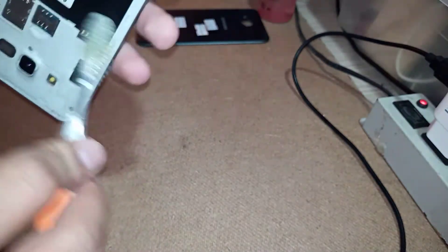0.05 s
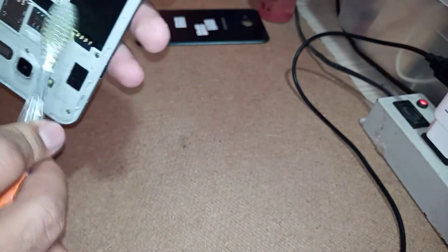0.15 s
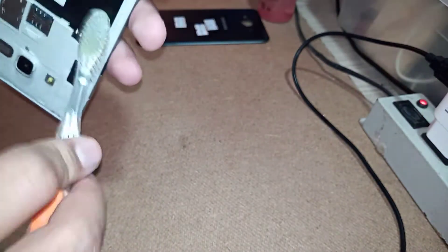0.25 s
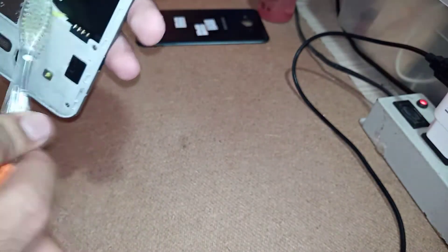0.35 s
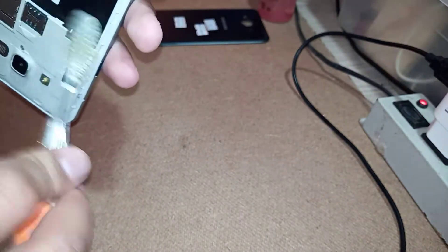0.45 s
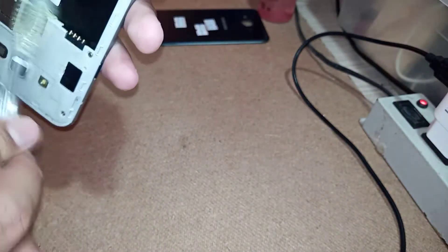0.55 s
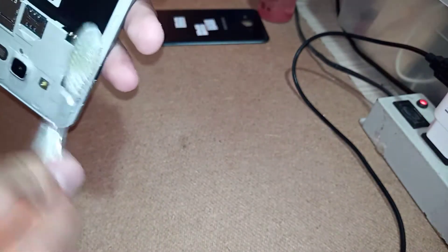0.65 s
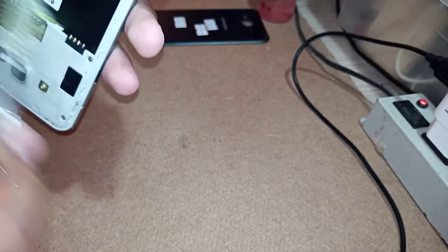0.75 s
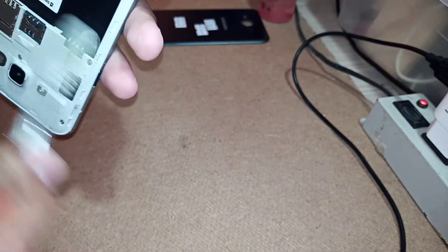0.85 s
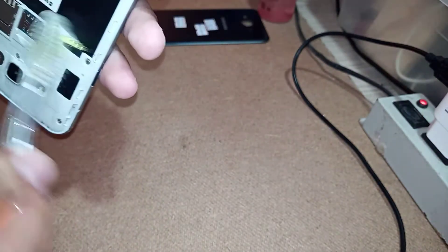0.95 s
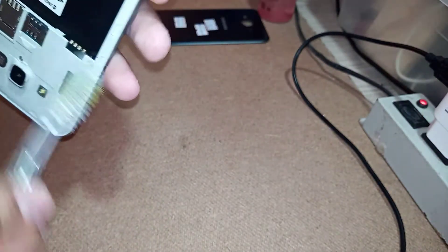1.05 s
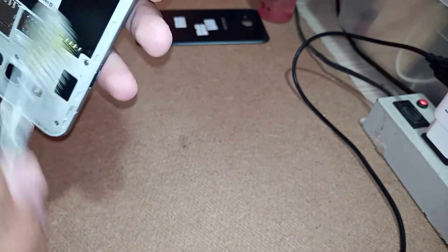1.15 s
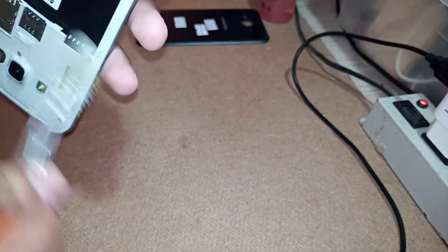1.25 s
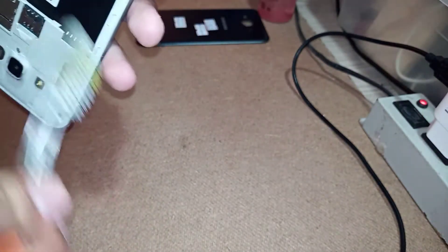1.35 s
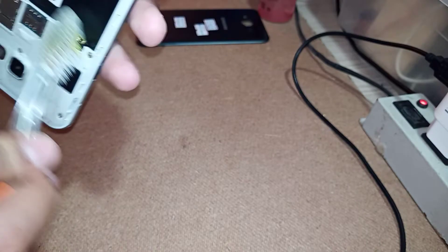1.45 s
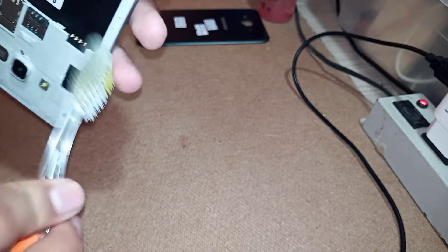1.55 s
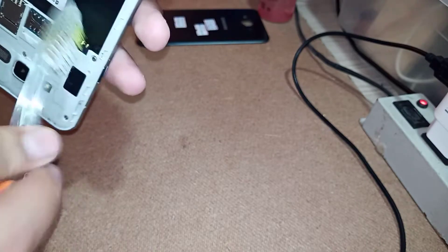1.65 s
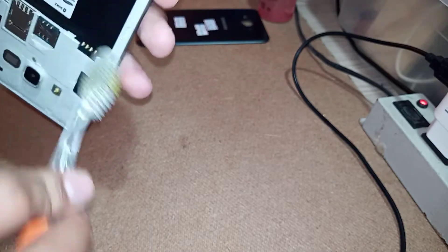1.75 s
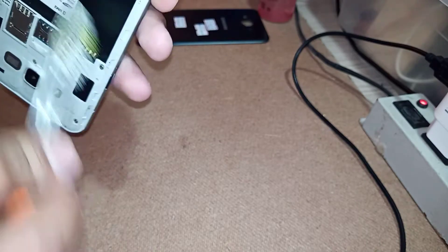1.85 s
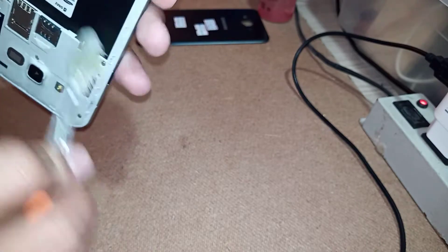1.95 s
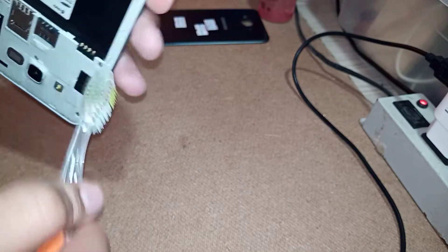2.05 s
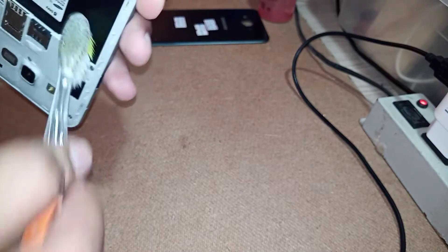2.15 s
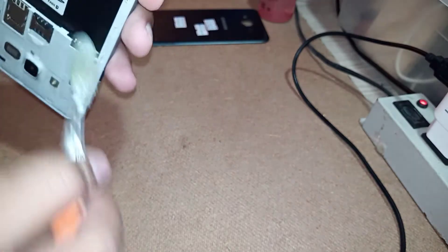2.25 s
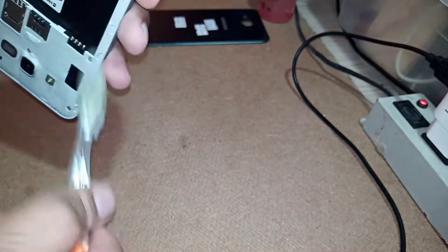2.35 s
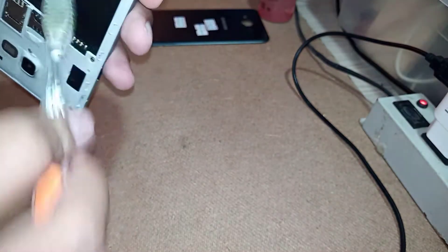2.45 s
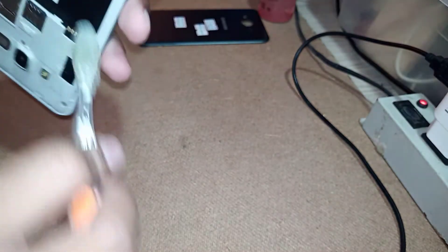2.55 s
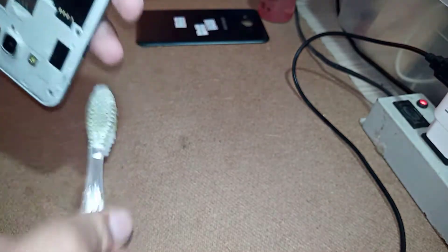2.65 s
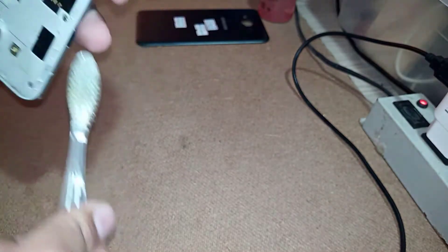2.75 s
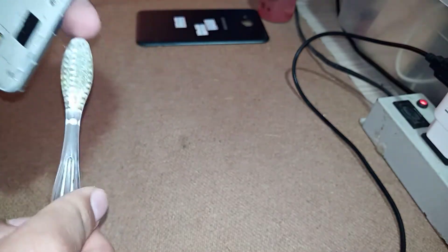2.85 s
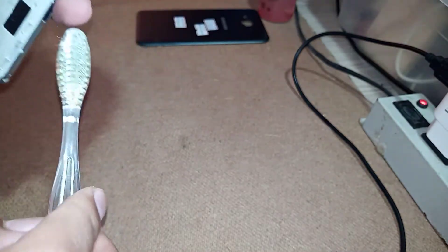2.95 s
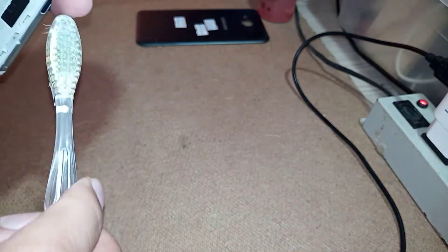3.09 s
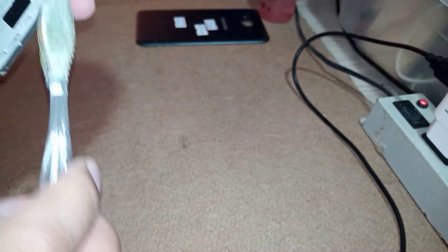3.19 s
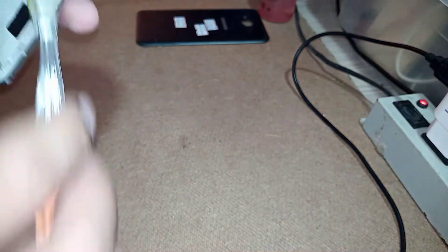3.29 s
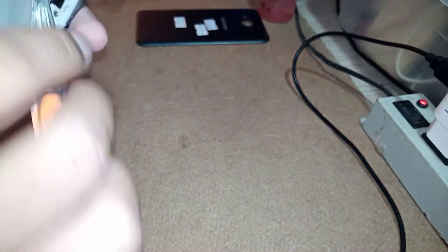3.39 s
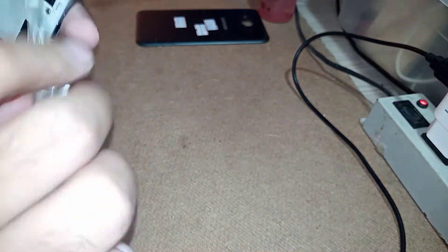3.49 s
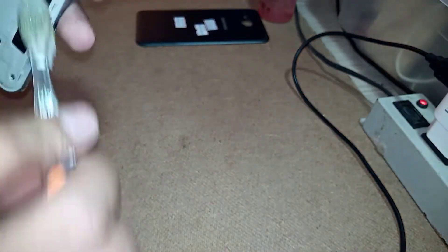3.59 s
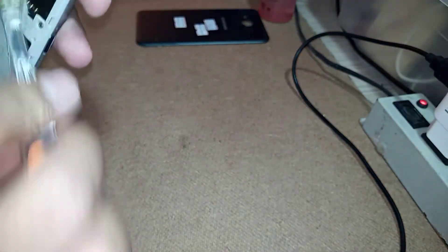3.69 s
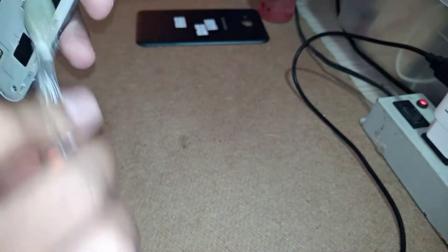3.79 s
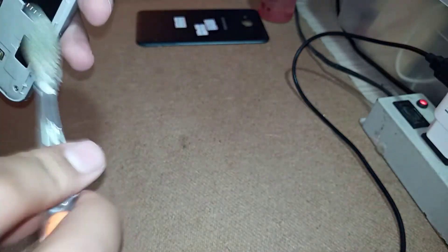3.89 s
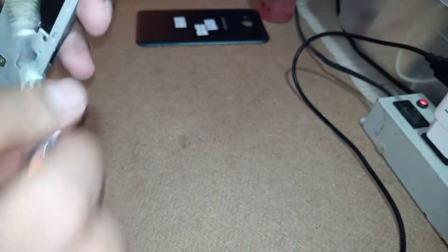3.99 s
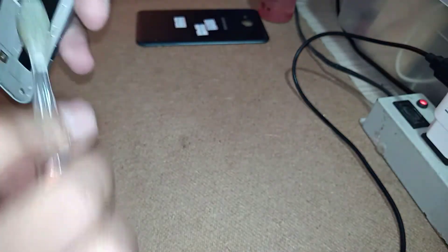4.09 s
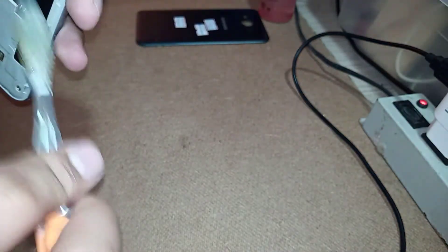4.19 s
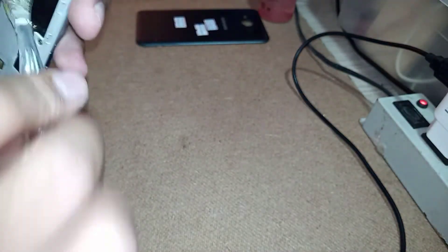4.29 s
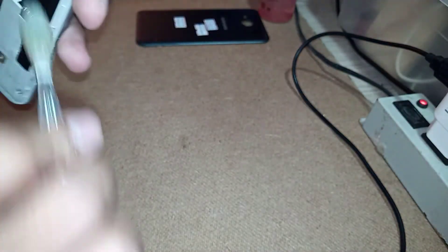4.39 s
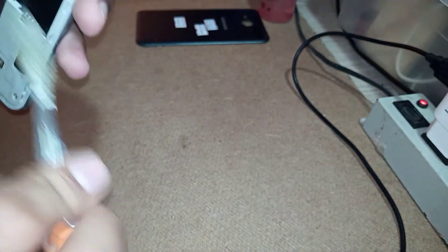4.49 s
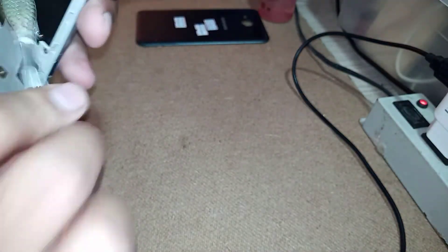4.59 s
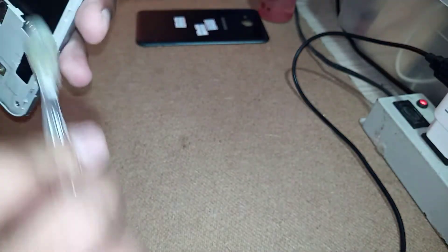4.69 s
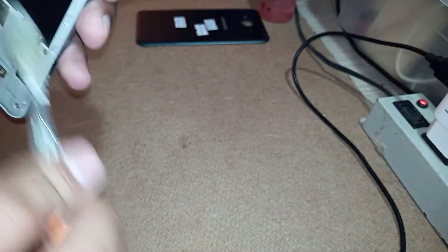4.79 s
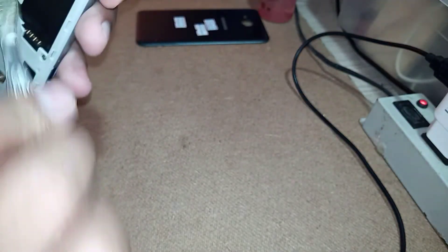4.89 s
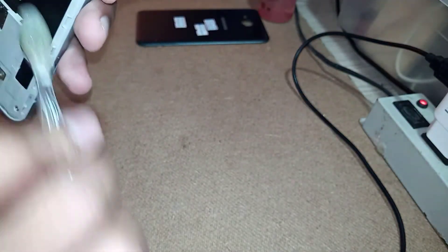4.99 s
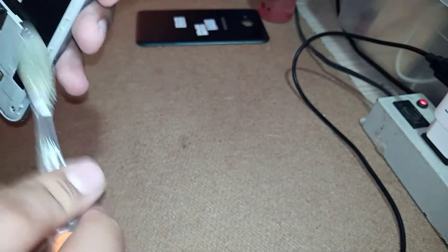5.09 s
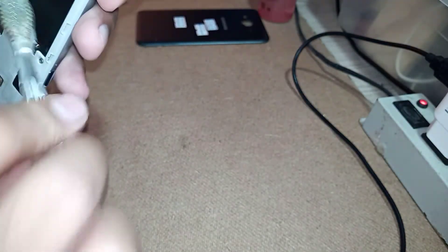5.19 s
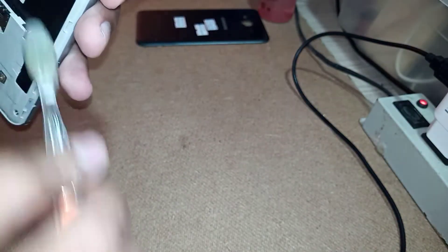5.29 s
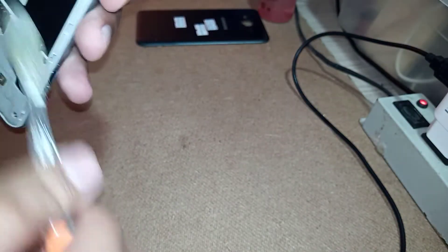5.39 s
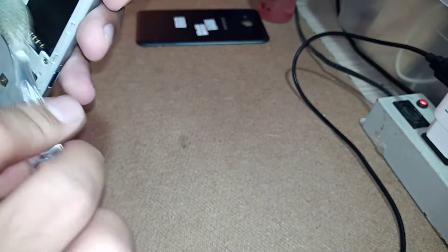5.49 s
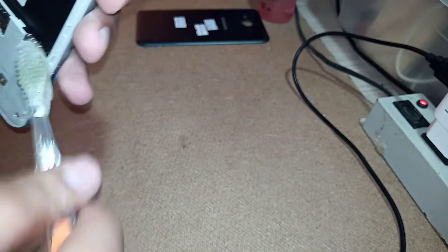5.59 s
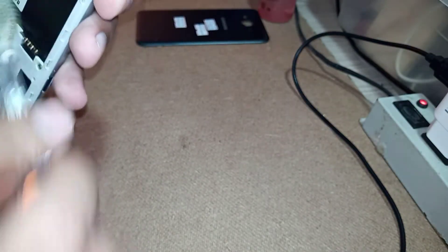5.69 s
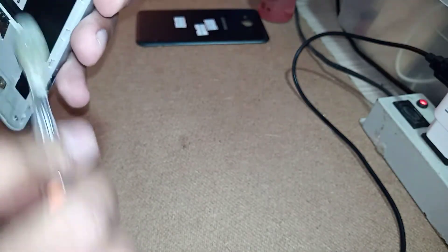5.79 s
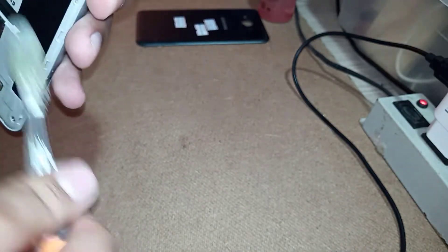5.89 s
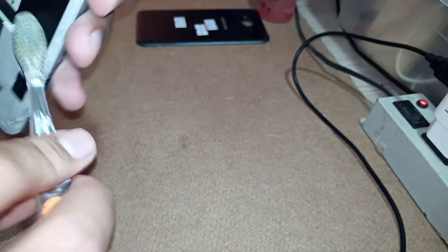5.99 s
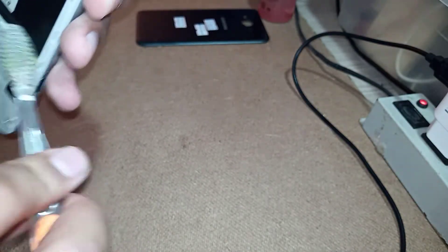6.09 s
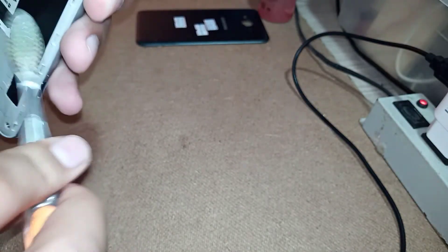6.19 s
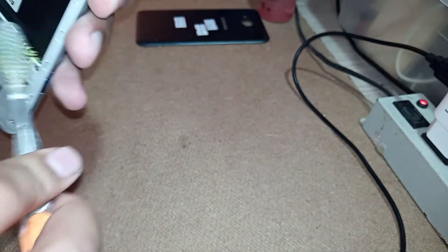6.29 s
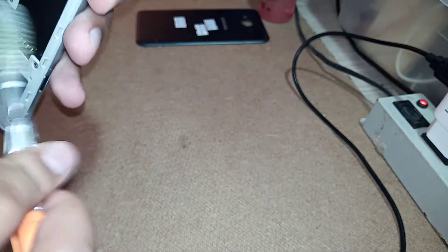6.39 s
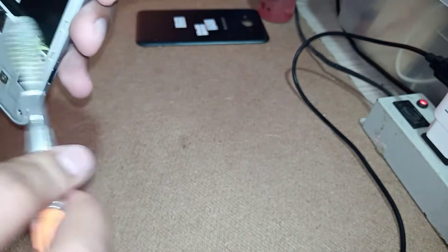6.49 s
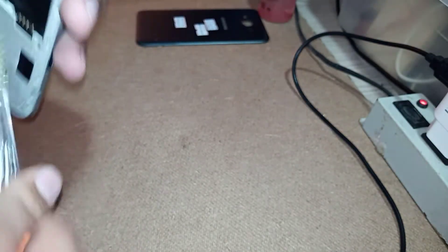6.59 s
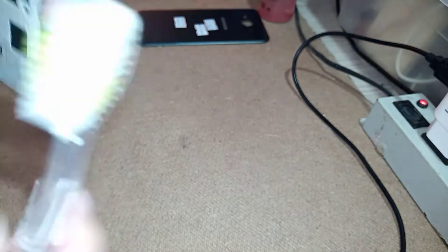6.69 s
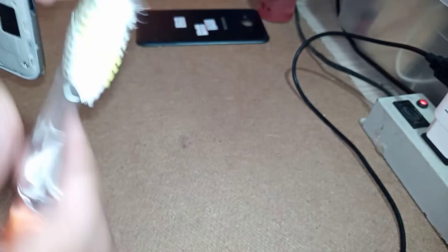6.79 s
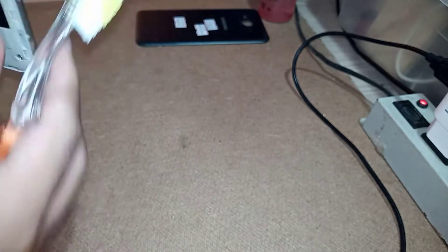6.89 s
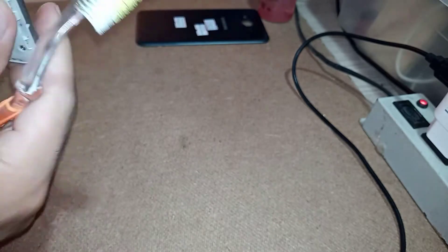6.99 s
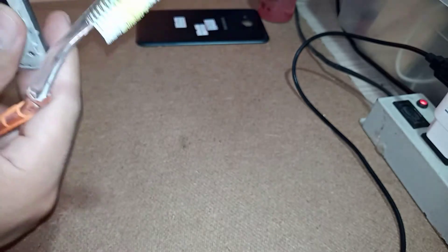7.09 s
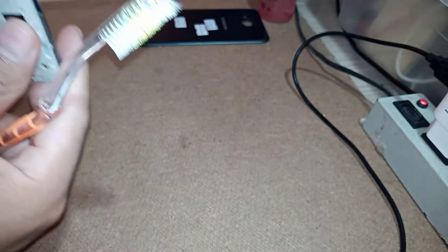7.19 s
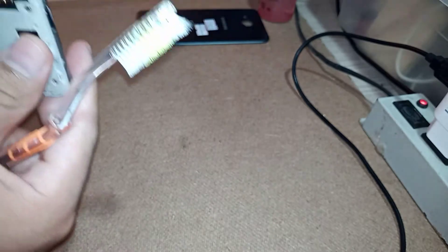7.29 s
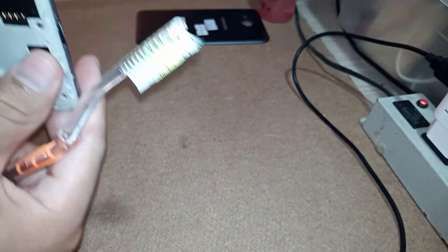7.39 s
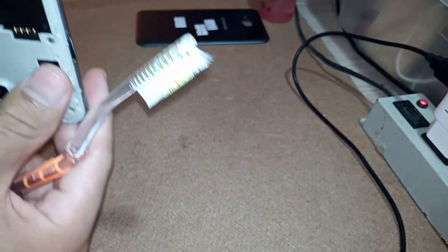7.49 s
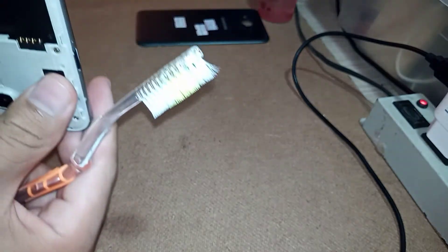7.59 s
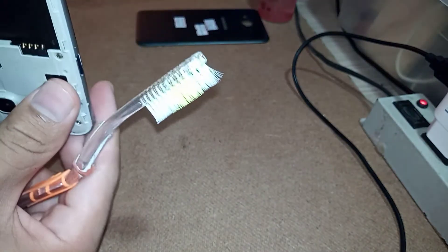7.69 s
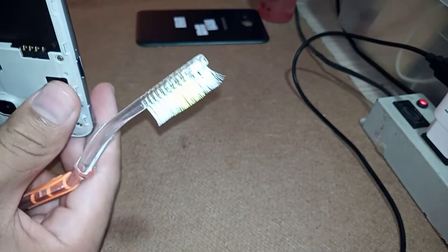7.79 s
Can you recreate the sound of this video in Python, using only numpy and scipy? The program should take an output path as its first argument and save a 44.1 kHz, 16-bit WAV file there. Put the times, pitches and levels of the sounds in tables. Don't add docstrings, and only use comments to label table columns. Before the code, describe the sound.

Dry, bright bristle rasps flick over small ribs of a hand-held phone, quick and continuous at first, then spaced about a quarter second apart. The brush head clacks sharply on the hard frame as it lands, with a small hollow ring. A pause lets a far engine rev through; more strokes follow, ending in near silence. Close microphone, small indoor room, low hiss.

```python
import sys
import numpy as np
from scipy import signal
from scipy.fft import rfft, irfft
from scipy.io import wavfile
from scipy.ndimage import uniform_filter1d

SR = 44100
rng = np.random.default_rng(int(sys.argv[2]) if len(sys.argv) > 2 else 0)


def field_ratio(decibels):
    return 10 ** (np.asarray(decibels, dtype=float) / 20)


def master_out(mix):
    frames = np.transpose(np.atleast_2d(mix))
    ceiling = np.clip(frames, -1, 1)
    pcm = np.round(ceiling * 32767).astype(np.int16)
    wavfile.write(sys.argv[1], SR, pcm)


N = 346171
T = np.arange(N) / SR

# [fastest t/s, fall t/s, pressure level/dB, tip flick above pressure level/dB]
SCRUBS = [(0.0, 0.049, -50, -1), (0.126, 0.036, -40.5, -2), (.223, 0.033, -40.5, -0.5),
          (0.352, .035, -38, -1), (0.448, 0.035, -41.5, -1), (0.556, 0.04, -38.5, -1.5),
          (.662, 0.038, -40.5, -0.5), (0.769, 0.033, -38.5, 2), (0.884, 0.041, -40.5, 1),
          (.987, .03, -37, -4.5), (1.061, 0.032, -37, -1.5)]
SWEEPS = [(1.288, 0.027, -37.5, 3.5, 1.1), (1.52, 0.048, -39, 4, 2.5), (1.762, 0.036, -39, 4, 0.8),
          (2.011, 0.071, -45.5, 1.5, 0.5), (2.283, 0.044, -42.5, 1, 3.1), (2.576, 0.047, -42.5, -1, 2.5),
          (3.56, 0.056, -42, 1, 2), (3.843, 0.064, -43.5, 2.4, 1.17), (4.14, 0.059, -43.5, 1.5, 1.5),
          (4.434, 0.039, -39, 1, 1.4), (4.72, 0.052, -43, 2.6, 1.2), (5.015, 0.053, -41.5, 2.5, 2.9),
          (5.295, .062, -44, 2.7, 2.4), (5.57, 0.056, -39, -1, 1.2), (5.822, 0.056, -42.5, -0.5, 1.5),
          (6.11, 0.088, -49.5, -6, 1.9), (6.322, 0.036, -46.5, 2.3, 1.6), (6.523, 0.018, -43, 2.5, 2.8)]
# [t/s, level/dB]
BITES = [(0.13, -4), (0.165, -4), (0.355, 2), (0.376, -3), (0.565, 2), (0.64, 5), (0.655, 5), (0.734, -3),
         (0.77, 3), (0.828, -5), (0.986, 3), (1.017, -4), (1.058, 2), (1.255, 3), (1.296, 6), (1.308, -3),
         (1.318, 5), (1.516, 6), (1.538, 3), (1.556, -3), (1.727, -12), (1.768, 7), (1.81, 12), (1.933, -3),
         (2.001, 3), (2.023, 3), (2.301, -3), (2.315, 5), (2.367, 6), (2.608, 6), (3.496, -5), (3.52, -4),
         (3.592, -3), (3.778, -8), (3.9, 3), (4.075, -3), (4.1, 5), (4.355, -6), (4.409, -4), (4.439, 2),
         (4.685, 3), (4.78, 6), (5.02, 3), (5.05, -4), (5.083, 4), (5.253, -3), (5.27, 4), (5.513, -8),
         (5.543, 3), (5.559, 2), (5.573, 3), (5.603, 2), (5.8, 2), (6.094, 3), (6.109, -3), (6.146, 3),
         (6.272, -4), (6.308, -4), (6.465, 4), (6.48, -5)]
# [t/s, level/dB]
LEAN = [(0, -1), (.4, -1), (.8, 0), (1.29, -1), (1.53, -1), (1.77, -1), (2.01, 1), (2.28, 1), (2.58, 2),
        (3.56, 1), (3.84, -2), (4.14, 1), (4.43, -1), (4.73, 2), (5.02, 2), (5.57, -1), (5.83, -3.5),
        (6.1, 2.5)]
# [f/Hz, width f/Hz, level/dB]
RIBS = [(470, 260, -21), (970, 390, -26), (3650, 1300, -3), (4904, 600, -8), (6335, 1400, -13.5),
        (6966, 2610, 1.5)]
# [t/s, f/Hz, level/dB]
RIB_PATH = [(0, 5200, 0), (.13, 5000, 0), (.22, 4900, 0), (.35, 4900, 0), (.45, 5000, -3), (.56, 4900, 2),
            (.66, 5600, 0), (.77, 4900, 0), (.88, 5100, 0), (1.06, 5300, 0), (1.25, 4800, 2),
            (1.3, 5000, 2), (1.52, 4800, 2), (1.76, 4900, 0), (1.97, 4800, -3), (2.02, 4900, 4),
            (2.23, 5100, 0), (2.29, 5500, 0), (2.55, 5210, 2), (3.56, 5960, 0), (3.84, 5800, 0),
            (4.15, 5800, -4), (4.43, 4940, 2), (4.7, 4900, 0), (4.76, 5900, -2), (5.02, 5900, -5),
            (5.27, 4800, 0), (5.35, 5800, 0), (5.54, 4900, 0), (5.6, 4800, 4), (5.79, 4900, 2),
            (5.87, 5700, 2), (6.1, 5500, -3), (6.32, 5000, 0), (6.52, 4700, 2)]
# [t/s, f/Hz]
DRONE_PATH = [(0, 1800), (2.5, 1750), (3.502, 1800), (4.301, 1880), (6.001, 1850), (6.4, 1650)]
# [f/Hz, level per Hz/dB]
TIPS = [(7000, -34.5), (9000, -28.5), (10000, -10), (12500, 2), (15000, 3), (15800, -7)]
TRAY = [(900, -18.5), (1500, -9), (2200, -1), (2600, -5), (3200, -23.5), (4500, -36)]
HOLLOW = [(250, -15.5), (340, -21.5), (455, -7.5), (670, -20.5), (970, -16.5), (1300, -13), (1650, 0),
          (1850, -8.5), (2050, -8.5), (2800, -10), (3600, -50.5)]

# [t/s, peak level/dB, dullness level/dB, scuff level/dB, drone level/dB]
LANDINGS = [(1.2247, -26, -28.5, -33.5, -68), (1.476, -26, -20.5, -38, -70), (1.71, -27, -21.5, -41, -68),
            (1.9437, -4.5, -1, -34.5, -60.5), (2.1887, -5, -2, -39.5, -61), (2.5056, -3.5, 27.5, -37, -51),
            (3.469, -9, -1.5, -42, -52.5), (3.7557, -23.5, -18.5, -41.5, -67),
            (4.0504, -4, -10.5, -32.5, -48.5), (4.3307, -4, -0.5, -35.5, -43.5),
            (4.6499, -9.5, 25, -36, -64), (4.9521, -9, 24, -35, -62), (5.2329, -17, -1.5, -39.5, -67),
            (5.493, -24, -23, -40.5, -69), (5.7585, -44, -20, -40.5, -65.5),
            (5.9956, -4, -14.5, -34.5, -49.5), (6.2372, -10.5, 4, -55.5, -54),
            (6.4285, -7.5, 12.5, -38, -70)]
# [t/s, peak level/dB, dullness level/dB]
TICKS = [(0.2104, -27, 0.5), (0.245, -14, 22), (0.282, -25.5, 12), (0.3147, -30, -21), (0.4693, -14, 13),
         (0.5199, -20, -0.5), (0.6783, -10.5, 18), (0.9011, -11.5, 9), (1.2289, -23.5, -4.5),
         (1.318, -37, 1), (1.514, -54, -15), (1.5787, -41.5, -31), (1.7134, -29, -3.5), (1.742, -32, -23),
         (2.0673, -34.5, -2.5), (2.3128, -33, -24), (2.3653, -51, -32.5), (2.6068, -38, -32),
         (3.7578, -19.5, -13), (3.789, -27.5, -0.5), (4.385, -20.5, 5), (4.9768, -14, 15.5),
         (5.2289, -22, -3), (5.2713, -34, 1), (5.4976, -21, -5.5), (5.7598, -20, -9), (6.2419, -17, 4),
         (6.4444, -23, 6), (6.5173, -26, -1.5)]
# [t/s, peak level/dB, dullness level/dB]
FINGER_SHIFTS = [
    (2.398, -49, -24),
    (2.444, -43, -12),
]
# [t/s, peak level/dB, dullness level/dB]
MORE_TICKS = [(1.294, -25, -14), (1.818, -36, -14), (4.3884, -25, -6), (4.6144, -48, 0), (4.6644, -31, -14),
              (5.2424, -32, -16), (5.2624, -35, -3), (5.5418, -27, -5), (5.6034, -32, -18), (5.9539, -46, -16)]
# [f/Hz, level/dB, time to fall 60 dB t/s]
FRAME = [(3470, 4, 0.0031), (3910, -9, 0.0043), (4610, -2.5, 0.0064), (5240, -4, 0.0063),
         (6130, -15.5, 0.01)]
BODY = [(463, -20, 0.045), (1020, -8.5, 0.014), (1450, -8, 0.0037), (1880, 0, 0.013), (2400, 4, 0.008)]
EDGE = [(7600, -1, .005), (9000, -3, .005), (12000, -4, .005), (14800, -3, .005)]
# [f/Hz, level per Hz/dB]
CRACK = [(300, -30), (1300, -25), (2000, -6), (3600, -3), (6000, 0), (9000, -12), (15000, -12)]
# [f/Hz, level/dB]
BENCH = [(300, 3.5), (450, 6), (600, -3.5), (730, -12), (880, 3), (1100, 6.5), (16000, -8)]
# [f/Hz, level per Hz/dB]
KNOCK = [(300, -5), (450, -21), (680, -20), (1000, -3), (1400, -30.5), (1850, 6), (2300, -1), (3600, 5),
         (6000, -2), (9500, -20), (15000, -31)]
# [t/s, peak level/dB, low f/Hz, high f/Hz, high above low level/dB]
PANELS = [(0.244, -21, 2340, 3390, 0), (0.47, -22, 2430, 3250, 0), (0.52, -30, 1870, 3100, 0),
          (0.679, -18, 1860, 3210, 0), (0.902, -18, 1850, 3250, 0), (1.229, -35, 2340, 5480, 0),
          (1.477, -39, 2200, 4670, 0), (1.712, -39, 2220, 5080, 0), (1.944, -15, 2420, 3420, 0),
          (2.189, -17, 1000, 3780, 0), (2.506, -13, 2420, 3810, 0), (3.469, -18, 1820, 4460, 0),
          (3.755, -30, 2230, 5400, 0), (4.051, -15, 2480, 6080, 0), (4.331, -14, 1840, 3500, 0),
          (4.65, -15, 2410, 3470, 0), (4.953, -14, 2500, 3510, 0), (4.977, -20, 2480, 5210, 0),
          (5.233, -23, 2540, 5290, 0), (5.494, -33, 2150, 5220, 0), (5.76, -28, 2430, 5070, 0),
          (5.996, -17, 2400, 3260, 0), (6.238, -16, 999, 3110, 0), (6.429, -13, 1630, 3200, 0)]
# [t/s, from f/Hz, to f/Hz, level/dB, fade t/s]
LINGERS = [(.25, 420, 500, -68, .12), (.68, 420, 600, -67, .12), (1.23, 420, 500, -55, .12),
           (1.53, 450, 700, -59, .12), (1.72, 500, 700, -60, .12), (1.95, 700, 800, -58, .12),
           (2.2, 500, 900, -57, .15), (2.56, 1000, 900, -60, .17), (3.58, 500, 620, -68, .1),
           (3.78, 450, 640, -63, .15), (4.75, 460, 440, -66, .15), (4.75, 1100, 1500, -63, .12),
           (4.8, 4500, 4500, -64, .1), (5.23, 500, 450, -58, .1), (5.5, 450, 470, -60, .13),
           (5.84, 450, 450, -65, .08), (6.25, 1000, 1000, -58, .1), (6.33, 3100, 3200, -63, .07),
           (6.44, 450, 500, -56, .07), (6.46, 1050, 1150, -62, .13), (6.5, 3200, 3150, -61, .14),
           (6.7, 4700, 4700, -70, .08), (2.9, 4300, 4900, -81, .25), (3.4, 5200, 5400, -70, .04)]

# [f/Hz, level/dB]
ROOM = [(300, -7.5), (1000, -1.5), (2400, -21), (5000, -16), (10000, -21), (15000, -16)]
# [f/Hz, time to fall 60 dB t/s]
ROOM_T60 = [(300, 0.2), (1000, 0.33), (2400, 1), (5000, 0.58), (12000, 1)]
# [multiple of crank pitch, level/dB]
ENGINE_ORDERS = [(2, 0), (3, -15.5), (4, -14), (5, -10)]
# [t/s, f/Hz]
CRANK = [(0, 51), (1.8, 57.95), (2.6, 56.2), (2.9, 60), (3.5, 60.2), (7.85, 63)]
# [t/s, held t/s, tone level/dB]
REVS = [
    (1.75, 0.41, -71.5),
    (2.24, 0.4, -66),
    (2.86, .04, -77),
    (3.12, .04, -79),
    (3.5, .28, -68),
    (4.02, 0.25, -76),
]
# [f/Hz, level per Hz/dB]
RUMBLE = [(80, -23), (115, -16.5), (150, -7.5), (190, -9.5), (280, -6.5), (400, -12.5), (700, -26.5)]
# [t/s, level/dB]
BIKE_FAR = [(0, -68.5), (2.1, -64.5), (2.8, -77.5), (4.3, -76.5), (4.6, -76.5), (6.2, -74.5), (6.6, -92),
            (7.85, -100)]
# [f/Hz, level/dB]
WHINES = [(4650, -89), (5150, -92), (6400, -87), (600, -83)]
# [f/Hz, level per Hz/dB]
HISS = [(30, -40), (70, -36), (130, -21), (260, -12), (400, -10), (550, -8), (900, -10), (2200, -22),
        (3500, -22), (4700, -17), (7000, -18), (8600, -38), (10600, -40), (12500, -23), (15200, -18)]
# [t/s, level/dB]
HISS_LEVEL = [(0, -59.5), (3.4, -70.5), (6.8, -69), (7.85, -70)]
# [f/Hz, level/dB]
SIDE_SHARE = [(4400, -55), (4900, -12.5), (8000, -9.5), (10000, -6), (12000, -14), (15800, -16)]

SCRUB_RISE = 1.22
SCRUB_STOP, SWEEP_STOP = 3.25, 3.2
SCRUB_TRAY_DB, SWEEP_TRAY_DB = -6, -11
BITE_S = .006
BOUNCE_S = 0.035
BRISTLES_FIRST_S = 0.0011
RIB_DB = -4.5
SHIELD_RATIO, SHIELD_DB = 1.5, -12
TAIL_STOP_S, DRONE_STOP_S = .3, .36
BODY_DB, BODY_SLOPE, EDGE_DB = -6.5, 2.4, -16
GLANCE_DB, GLANCE_RATIO = -18, 1.4
RING_DB = -1.5
CRACK_DB, CRACK_RISE_S, CRACK_FALL_S, GLANCE_S_PER_DB = -7, .0009, .0018, .00008
PANEL_DB, PANEL_T60_S = -3, .011
REV_RISE_S, REV_FALL_S = .035, .05


def scrub():
    slips = bristles(rate=16000, spread_db=0.67, smooth=.8)
    other_slips = slips[::-1]
    patchy_db = 2.3 * np.array([wander(30) for _ in range(len(RIBS) + 3)])
    lean_db = np.interp(T, *np.transpose(LEAN))

    ribs = 0
    for (hz, width, db), patch_db in zip(RIBS, patchy_db):
        rib_db = db + patch_db + lean_db * (hz < 4400)
        ribs = ribs + field_ratio(rib_db) * resonate(slips, hz, width)
    ribs = unit(ribs)
    path = np.array(RIB_PATH)
    path_db = np.interp(T, path[:, 0], path[:, 2])
    ribs += field_ratio(RIB_DB + path_db + patchy_db[1]) * band(other_slips, path[:, :2], width_hz=550)
    shield_path = path[:, :2] * (1, SHIELD_RATIO)
    ribs += field_ratio(SHIELD_DB - lean_db + patchy_db[0]) * band(other_slips, shield_path, width_hz=900)

    tips = field_ratio(.7 * patchy_db[-1]) * unit(colour(slips, TIPS))
    tray = field_ratio(.7 * patchy_db[-2]) * unit(colour(slips, TRAY))
    hollow = field_ratio(.7 * patchy_db[-3]) * unit(colour(slips, HOLLOW))
    out = tips * rub_strength(tips=True, tray=False, scuff_db=-19, scuff_s=.02)
    out += ribs * rub_strength(tips=False, tray=False, scuff_db=-4, scuff_s=0.031)
    out += tray * rub_strength(tips=True, tray=True, scuff_db=-13, scuff_s=.03)
    out += hollow * field_ratio(-43) * np.sqrt(scuff(column=1, fade_s=0.09, stop_s=DRONE_STOP_S))
    drone_power = scuff(column=4, fade_s=.11, stop_s=DRONE_STOP_S)
    return out + band(other_slips, DRONE_PATH, width_hz=160) * np.sqrt(drone_power)


def bristles(rate, spread_db, smooth):
    chance = rng.random((2, N))
    size = field_ratio(-spread_db * np.log(1 - chance[1]))
    slips = (chance[0] < rate / SR) * size * rng.standard_normal(N)
    tufts_db = 2.4 * wander(170) + .9 * wander(45)
    return (unit(slips) + smooth * rng.standard_normal(N)) * field_ratio(tufts_db)


def rub_strength(tips, tray, scuff_db, scuff_s):
    t, power = T[::32], 0
    landed = np.array(LANDINGS)[:, 0]
    scrubs = [row + (SCRUB_RISE,) for row in SCRUBS]
    groups = ((scrubs, SCRUB_STOP, SCRUB_TRAY_DB), (SWEEPS, SWEEP_STOP, SWEEP_TRAY_DB))
    for rows, stop, tray_db in groups:
        for s, fall, db, tip_db, rise in rows:
            before = (np.abs(s - t) / (rise * fall)) ** 1.9
            after = (np.abs(t - s) / fall) ** stop
            swell = np.exp(-2.8 * np.where(t < s, before, after))
            last_landing = landed[landed < s].max(initial=-1)
            touch = 1 - np.exp(-(np.maximum(t - last_landing, 0) / BOUNCE_S) ** 2)
            power = power + field_ratio(2 * (db + tips * tip_db + tray * tray_db)) * swell * touch
    bite_db = sum(db * np.exp(-((t - s) / BITE_S) ** 2) for s, db in BITES)
    power = power * field_ratio(2 * bite_db)
    return np.sqrt(np.interp(T, t, power) + scuff(column=3, fade_s=scuff_s) * field_ratio(2 * scuff_db))


def scuff(column, fade_s, stop_s=np.inf):
    landings = np.array(LANDINGS)
    starts = np.zeros(N)
    starts[((landings[:, 0] - BRISTLES_FIRST_S) * SR).astype(int)] = field_ratio(2 * landings[:, column])
    t = T[:SR // 2]
    fade = np.exp(-t / fade_s - 2 * (t / stop_s) ** 6)
    return np.abs(signal.fftconvolve(starts, fade)[:N])


def knocks():
    out, blows, crack = np.zeros(N), np.zeros(N), np.zeros(N)
    t = np.arange(SR // 16) / SR
    for s, peak_db, dull_db, *_ in LANDINGS + TICKS + FINGER_SHIFTS + MORE_TICKS:
        body_db = BODY_DB + BODY_SLOPE * min(dull_db, 0)
        edge_db = EDGE_DB - dull_db
        glancing = peak_db < GLANCE_DB and dull_db < 0
        frame = np.multiply(FRAME, (GLANCE_RATIO if glancing else 1, 1, 1))
        chance = rng.standard_normal((3, 5, 1))

        blow = np.zeros(SR // 200)
        when = np.array([0, .0003, .0009, .0016]) * (1 + .15 * chance[2, :4, 0])
        blow[(when * SR).astype(int)] = [0.0054, 0.77, -0.68, 0.68]
        parts = []
        for modes in (frame, BODY, EDGE):
            ringing = ring(modes, chance[:, :len(modes)], t)
            parts.append(np.convolve(blow, ringing)[:len(t)])
        parts[0], parts[2] = np.gradient(parts[0]), np.gradient(parts[2])
        i = int((s + 0.00064) * SR)
        for part, db in zip(parts, (0, body_db, edge_db)):
            out[i:i + len(t)] += field_ratio(peak_db + RING_DB + db) * part / np.abs(part).max()
        blows[i] = field_ratio(peak_db + body_db / 2)

        fall = CRACK_FALL_S - GLANCE_S_PER_DB * min(dull_db, 0)
        lead = t - 5 * CRACK_RISE_S
        swell = np.exp(np.minimum(lead, 0) / CRACK_RISE_S - np.maximum(lead, 0) / fall)
        j = int((s + .0012 - 5 * CRACK_RISE_S) * SR)
        crack[j:j + len(t)] += field_ratio(peak_db + CRACK_DB) * swell
    out += crack * unit(colour(rng.standard_normal(N), CRACK)) / 2
    return colour(out, BENCH), colour(blows, KNOCK)


def ring(modes, chance, t):
    hz, db, t60 = np.transpose(modes)[:, :, None]
    vary_db, vary_hz = 1.5 * chance[0], 1 + .02 * chance[1]
    tones = np.sin(2 * np.pi * hz * vary_hz * t)
    return np.sum(field_ratio(db + vary_db) * tones * 1000 ** (-t / t60), axis=0)


def panels():
    out, t = np.zeros(N), T[:SR // 32]
    fade = np.clip(t / .0006, 0, 1) * 1000 ** (-t / PANEL_T60_S)
    for s, db, low_hz, high_hz, high_db in PANELS:
        i = int((s + .0005) * SR)
        low, high = np.sin(2 * np.pi * np.outer((low_hz, high_hz), t)) * fade
        out[i:i + len(t)] += field_ratio(db + PANEL_DB) * (low + field_ratio(high_db) * high * fade)
    return out


def lingers():
    out, t = np.zeros(N), T[:SR // 2]
    for s, from_hz, to_hz, db, fade_s in LINGERS:
        glide_hz = to_hz + (from_hz - to_hz) * np.exp(-t / fade_s)
        turns = 2 * np.pi * np.cumsum(glide_hz) / SR
        low = signal.butter(2, 50 + .04 * to_hz, fs=SR, output="sos")
        a, b = signal.sosfilt(low, rng.standard_normal((2, len(t))))
        hum = unit(a * np.cos(turns) + b * np.sin(turns))
        shape = (1 - np.exp(-t / .02)) * np.exp(-(t / (1.6 * fade_s)) ** 2)
        i = int(s * SR)
        out[i:i + len(t)] += field_ratio(db) * shape * hum
    return out


def room(x):
    t, hz = np.arange(SR) / SR, np.arange(SR // 2 + 1)
    spectrum, tail = rfft(rng.standard_normal(SR)), 0
    for centre in 200 * 2 ** np.arange(0, 6.6, .5):
        share = np.clip(1 - np.abs(2 * np.log2(np.maximum(hz, 1) / centre)), 0, 1)
        fade = 1000 ** (-t / curve(ROOM_T60, centre))
        fade = fade * np.clip(t / 0.015, 0, 1) * np.exp(-(t / TAIL_STOP_S) ** 4)
        level = field_ratio(curve(ROOM, centre)) / np.sqrt(np.sum(fade ** 2))
        tail = tail + level * irfft(spectrum * share) * fade
    return signal.fftconvolve(x, tail)[:N]


def motorbike():
    crank_hz = np.interp(T, *np.transpose(CRANK)) * (1 + .025 * wander(14))
    phase = 2 * np.pi * np.cumsum(crank_hz) / SR
    tone = sum(field_ratio(db + 3.5 * wander(10)) * np.sin(k * phase) for k, db in ENGINE_ORDERS)
    load = 0
    for s, held, db in REVS:
        rise = np.minimum(T - s, 0) / REV_RISE_S
        fall = np.maximum(T - s - held, 0) / REV_FALL_S
        load = load + field_ratio(db) * np.exp(rise - fall)
    rumble_db = np.interp(T, *np.transpose(BIKE_FAR)) + 1.5 * wander(2.4)
    return load * tone + field_ratio(rumble_db) * unit(colour(rng.standard_normal(N), RUMBLE))


def whines():
    out = 0
    for hz, db in WHINES:
        drift = rng.standard_normal(22)
        path = [(s, hz * (1 + .025 * d)) for s, d in zip(np.arange(0, 8.5, .4), drift)]
        out = out + field_ratio(db + 3 * wander(9)) * band(rng.standard_normal(N), path, width_hz=220)
    return out


def hiss():
    hiss_db = np.interp(T, *np.transpose(HISS_LEVEL)) + 1.2 * wander(4)
    return field_ratio(hiss_db) * unit(colour(rng.standard_normal(N), HISS))


def unit(x):
    return x / np.sqrt(np.mean(x ** 2))


def curve(points, hz):
    f, v = np.transpose(points)
    return np.interp(np.log(np.maximum(hz, 1)), np.log(f), v)


def colour(x, points, size=2048):
    cep = irfft(curve(points, np.arange(size // 2 + 1) * SR / size) * np.log(10) / 20)
    cep[1:size // 2] *= 2
    cep[size // 2 + 1:] = 0
    return signal.oaconvolve(x, irfft(np.exp(rfft(cep))))[:len(x)]


def wander(rate):
    levels = rng.standard_normal(4096)
    joined = np.interp(T * rate, np.arange(len(levels)), levels)
    return unit(uniform_filter1d(joined, int(SR / rate)))


def resonate(x, hz, width):
    edges = [hz - width / 2, hz + width / 2]
    return unit(signal.sosfilt(signal.butter(2, edges, "band", fs=SR, output="sos"), x))


def band(x, points, width_hz):
    turns = 2j * np.pi * np.cumsum(np.interp(T, *np.transpose(points))) / SR
    low = signal.butter(2, width_hz / 2, fs=SR, output="sos")
    return unit(np.real(signal.sosfilt(low, x * np.exp(-turns)) * np.exp(turns)))


def scene():
    rub = scrub()
    hits, spread = knocks()
    small = signal.butter(5, 360, "high", fs=SR, output="sos")
    near = signal.sosfilt(small, rub + hits + panels())
    far = signal.sosfilt(small, rub + field_ratio(21) * spread)
    mix = near + lingers() + room(far) + motorbike() + whines() + hiss()
    return np.tile(mix, (2, 1))


def band_limit(x):
    return signal.sosfilt(signal.butter(12, 17000, fs=SR, output="sos"), x)


def record(dry):
    treble_cut = signal.ellip(8, .3, 34, 15900, fs=SR, output="sos")
    mono = signal.sosfilt(treble_cut, dry[0])
    side = colour(mono * wander(420), SIDE_SHARE)
    return band_limit(np.array([mono + side, mono - side]))


dry = scene()
out = record(dry)
master_out(out)
```